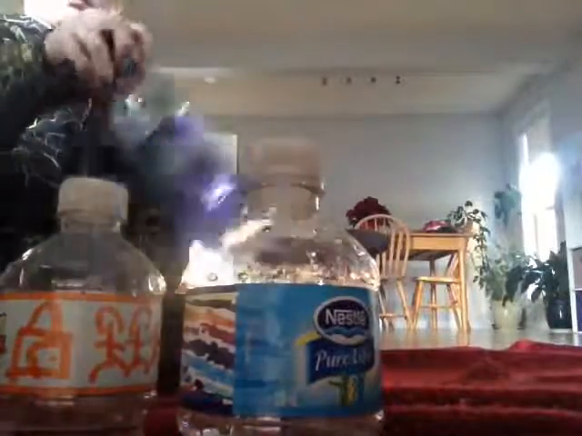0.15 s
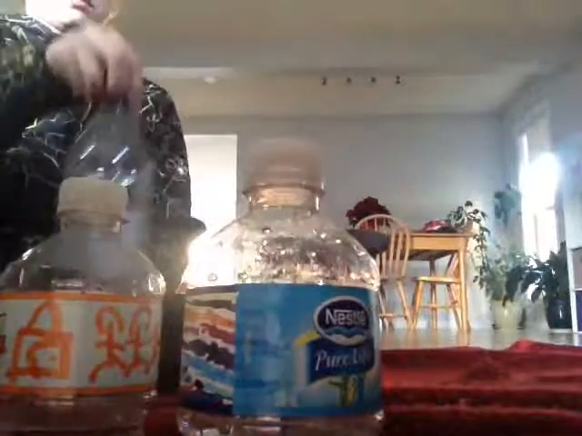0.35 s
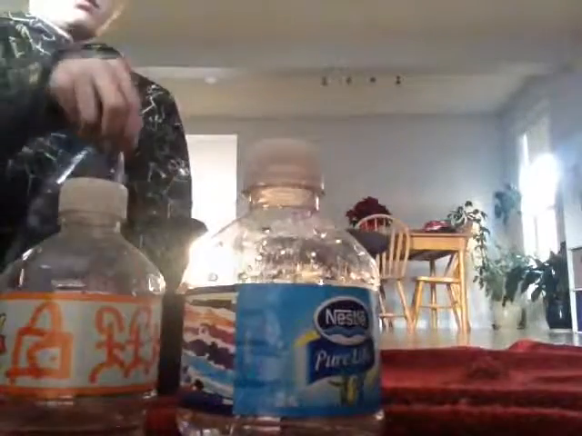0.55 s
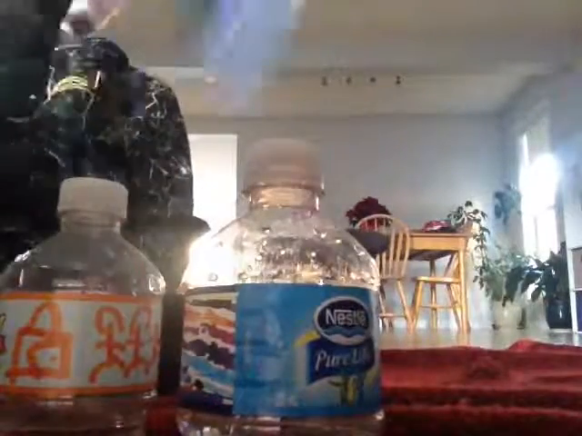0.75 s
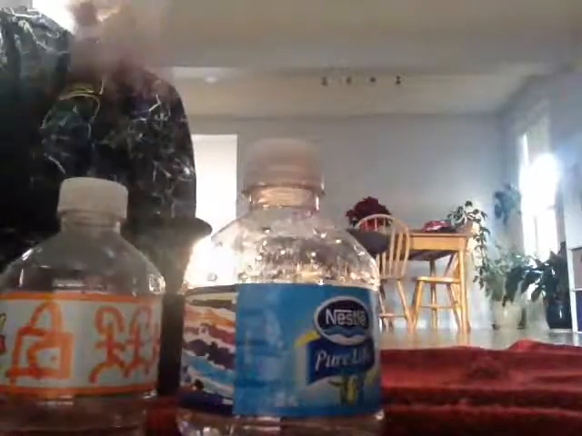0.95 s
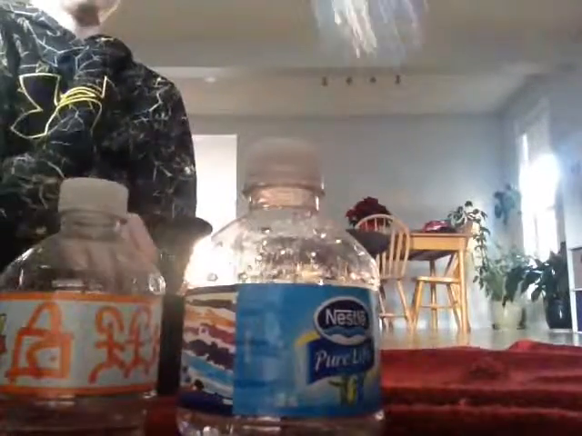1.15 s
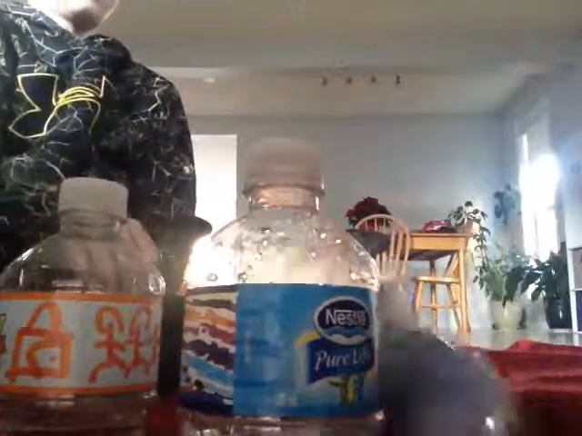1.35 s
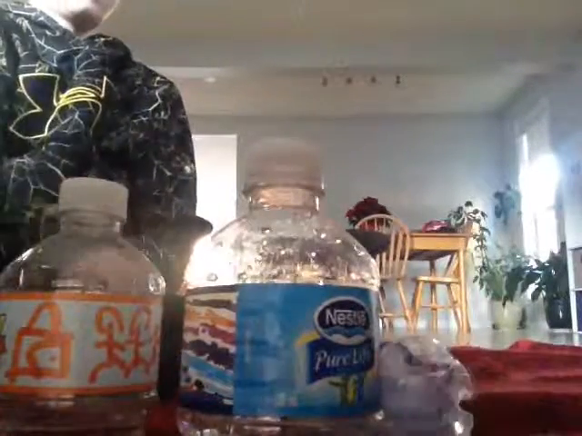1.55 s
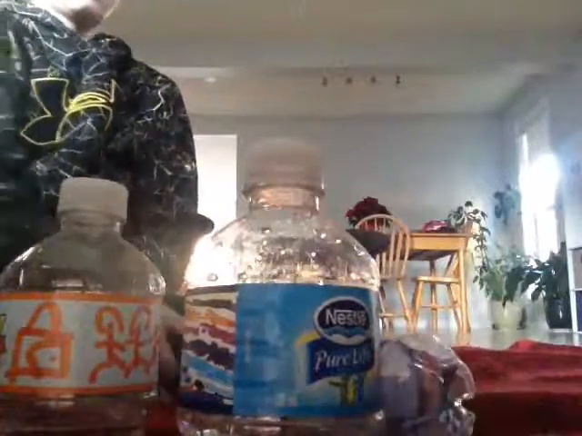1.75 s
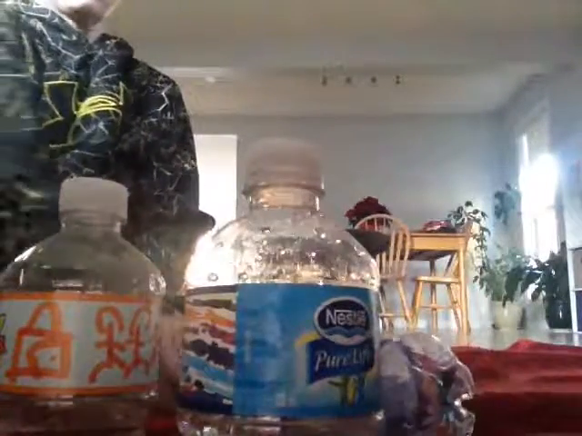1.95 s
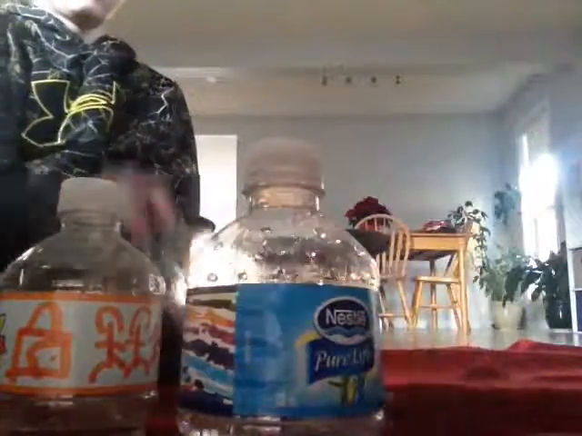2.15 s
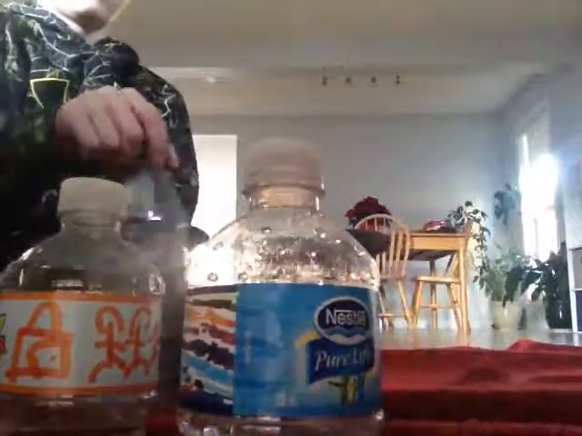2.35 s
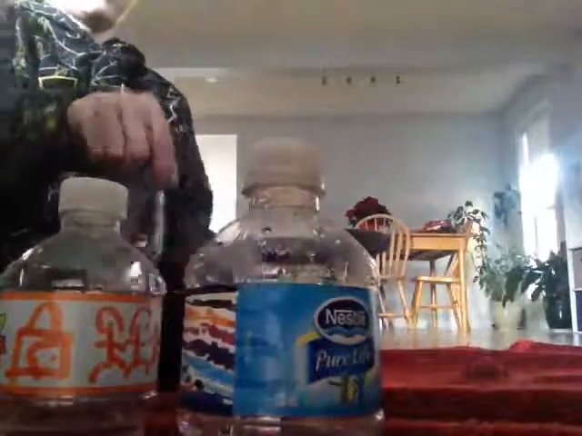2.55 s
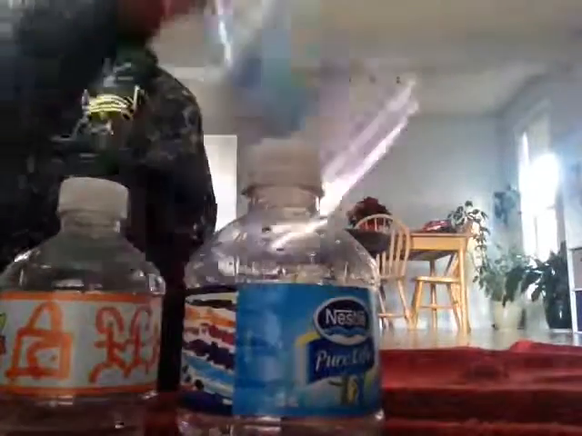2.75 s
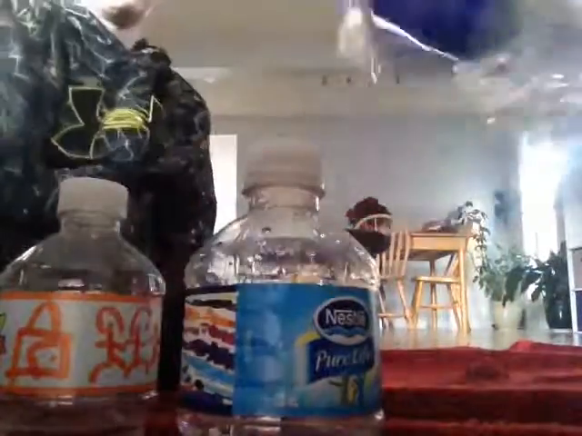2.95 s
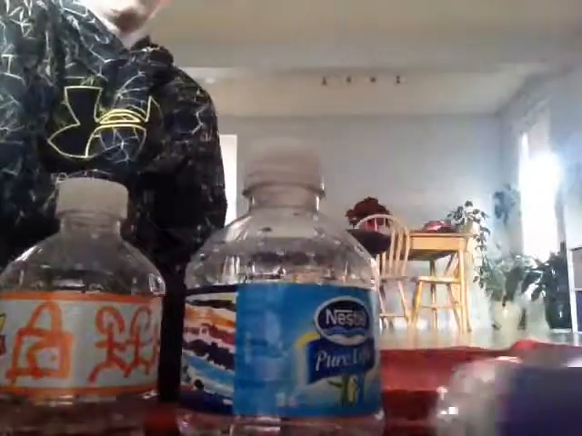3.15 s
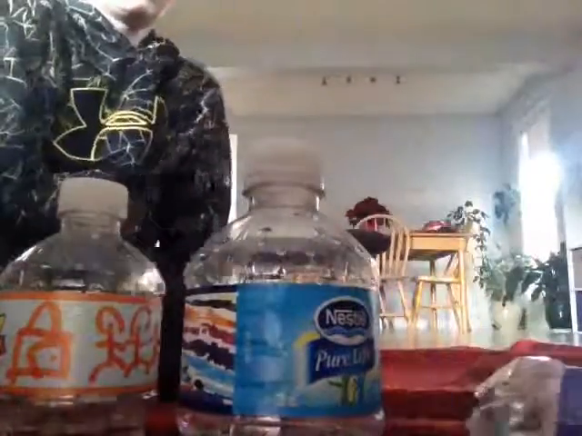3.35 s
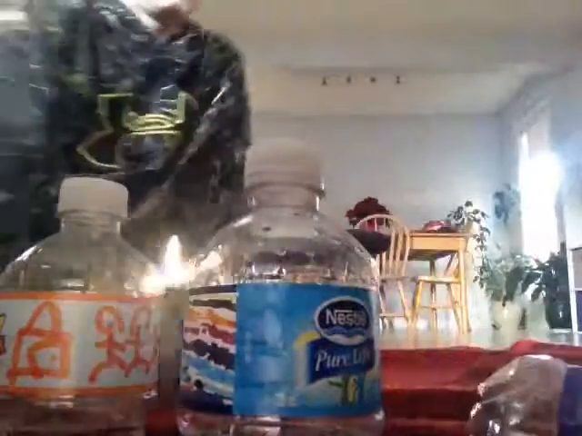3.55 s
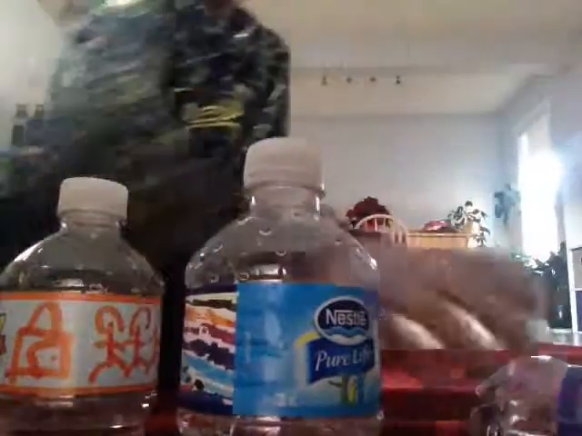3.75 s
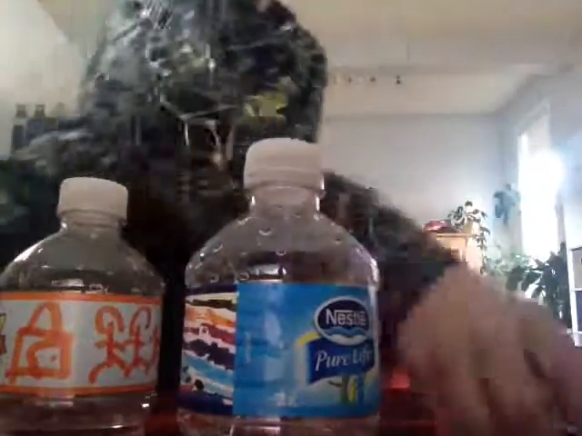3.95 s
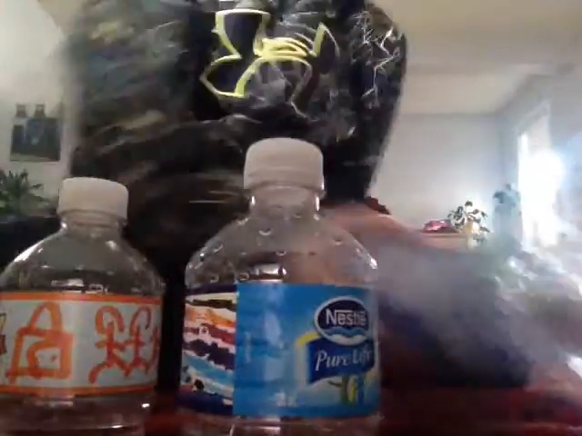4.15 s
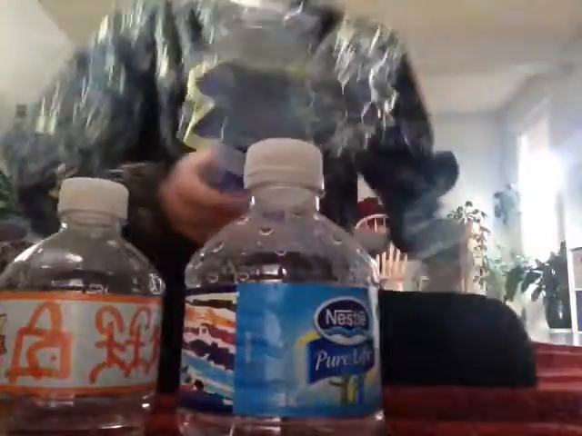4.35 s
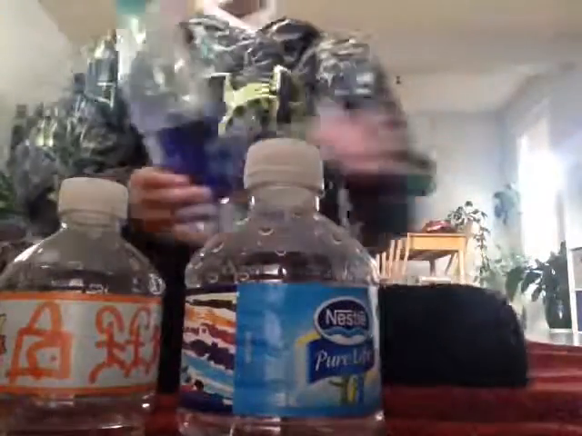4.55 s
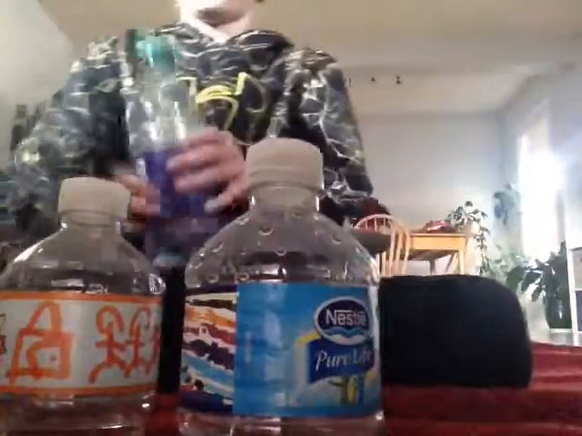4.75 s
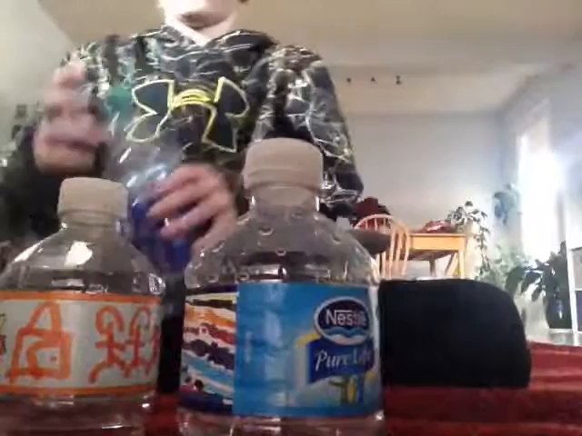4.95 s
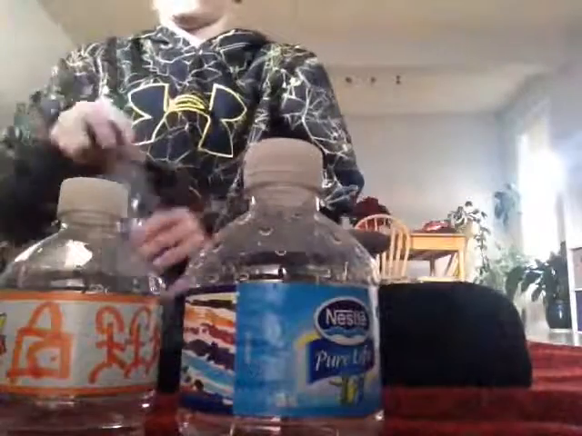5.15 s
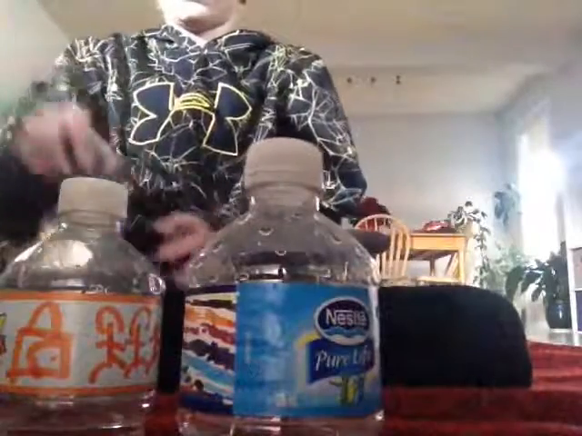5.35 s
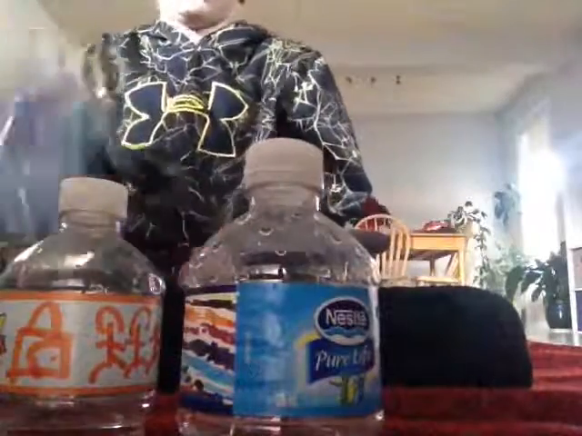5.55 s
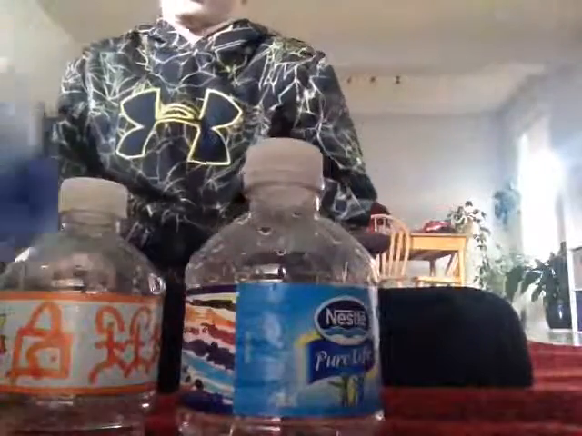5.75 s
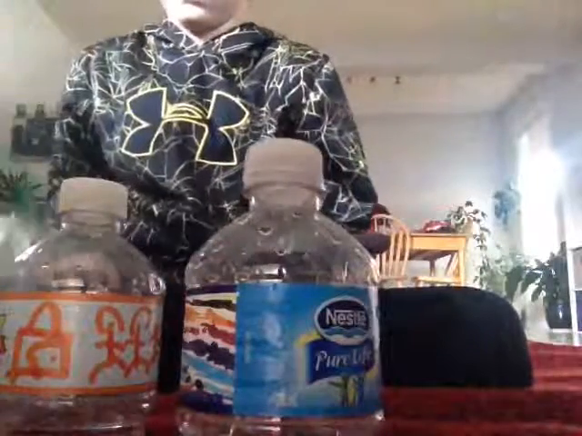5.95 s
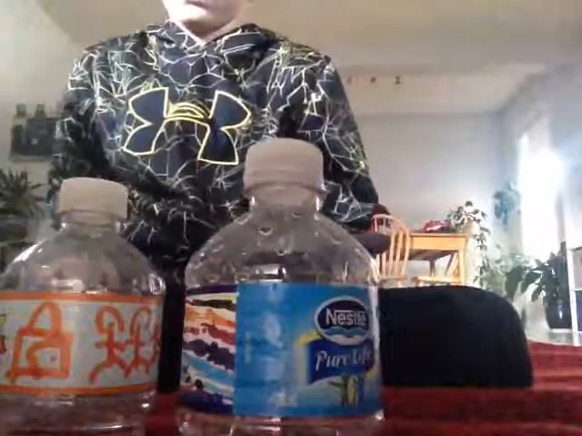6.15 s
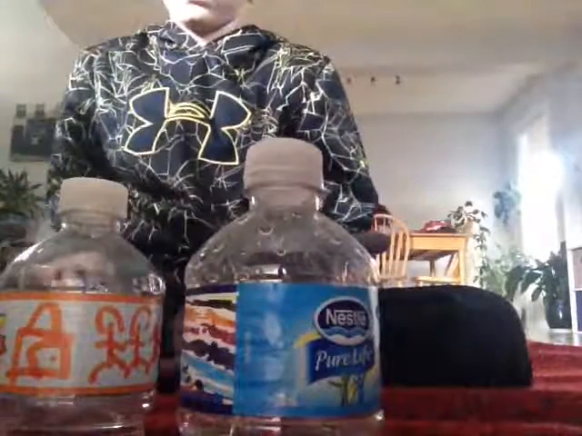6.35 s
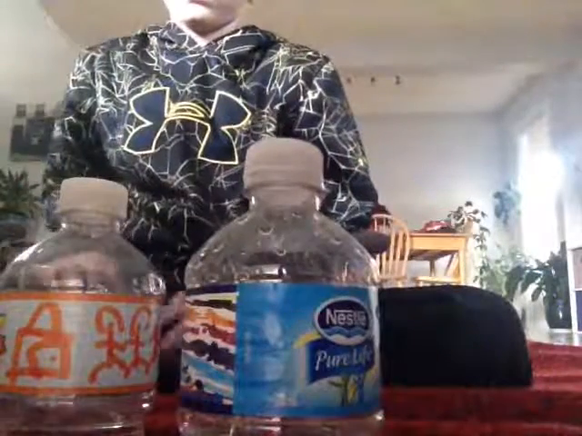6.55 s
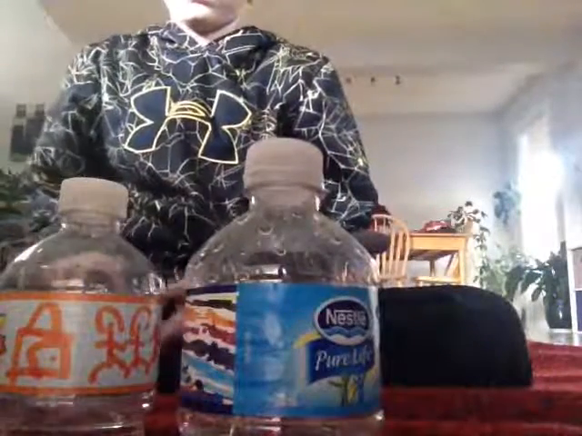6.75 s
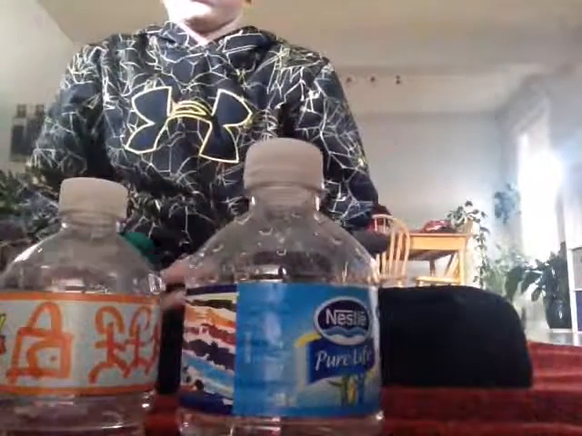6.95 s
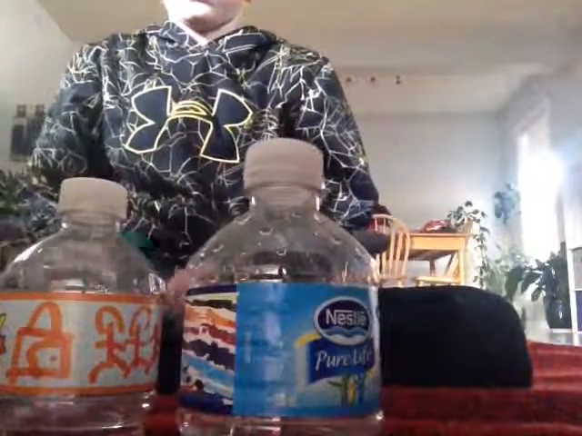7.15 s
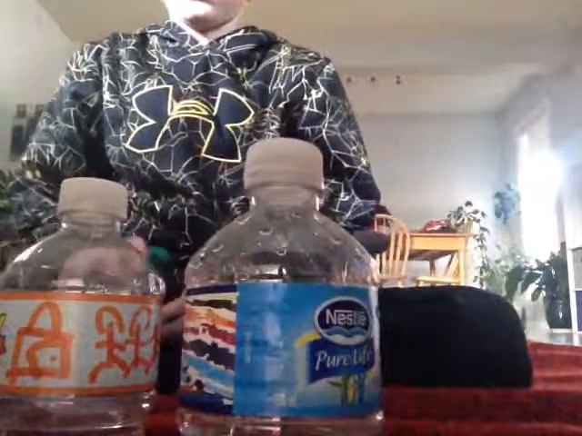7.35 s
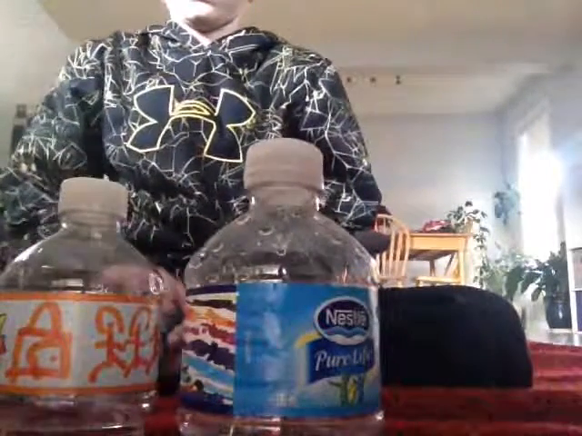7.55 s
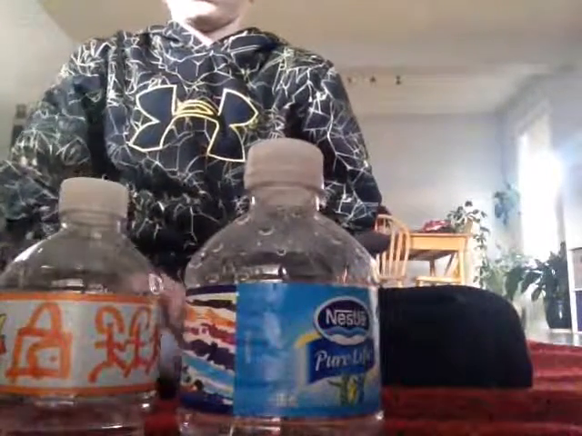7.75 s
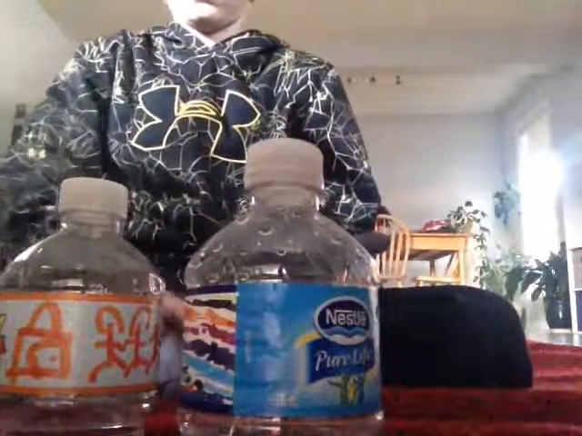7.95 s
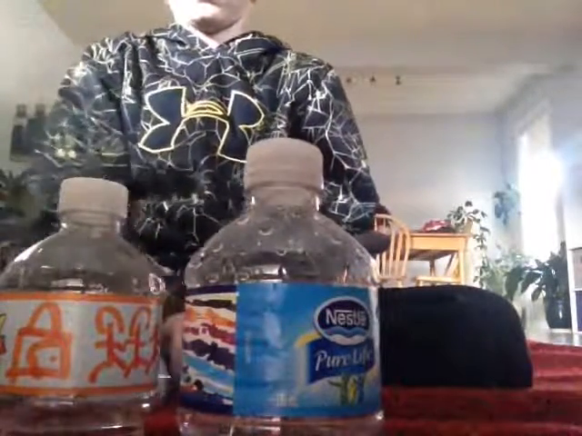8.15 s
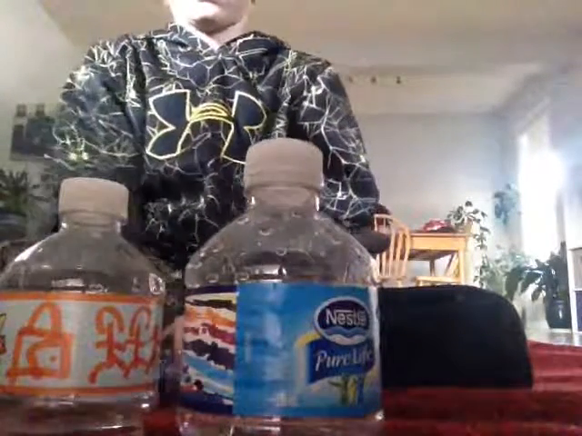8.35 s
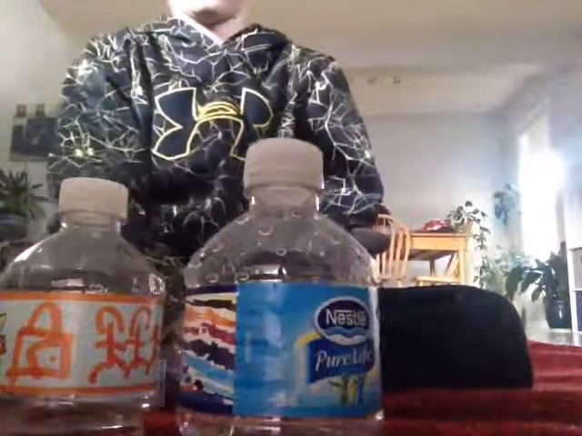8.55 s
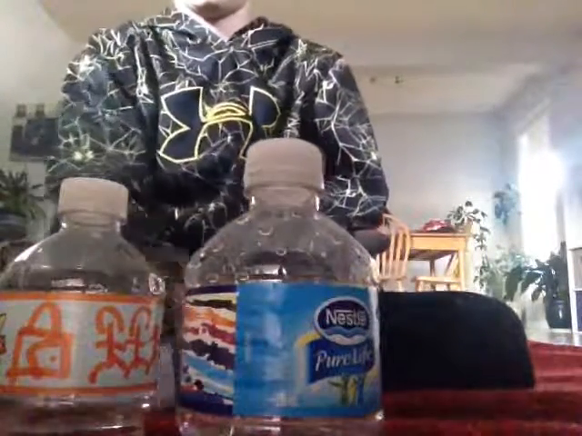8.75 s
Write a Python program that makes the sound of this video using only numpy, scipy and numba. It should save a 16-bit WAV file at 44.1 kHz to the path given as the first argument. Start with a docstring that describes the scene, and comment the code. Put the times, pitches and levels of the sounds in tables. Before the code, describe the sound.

Thin plastic bottles part-filled with water are flipped and land with heavy dull thumps, sloshing and crackling, in a quiet carpeted room.

```python
"""In a quiet, carpeted living room thin plastic bottles, partly filled with water, are flipped and land near a
small microphone. Each landing is a gliding thump with ringing floor modes; water and rubbing hands are clouds
of short sine grains; knocks on the walls are damped modes started by a noise crack. One air pocket hums upward.
Noise that dies away gives the room's echoes; steady hiss and wavering appliance tones lie beneath."""
import sys
import numpy as np
from scipy import signal
from scipy.fft import rfft, irfft
from scipy.io import wavfile
from scipy.ndimage import uniform_filter1d
from numba import njit

SR = 44100
rng = np.random.default_rng(int(sys.argv[2]) if len(sys.argv) > 2 else 0)


def transcribe(u):
    """Save the signal u as a 16-bit wav file named by the first command-line argument.

    u: samples, shape (n,) or (channels, n), limited to [-1, 1]; the rate is SR.
    q: integer samples, one column per channel.
    """
    v = np.clip(np.atleast_2d(u).T, -1, 1)
    q = np.round(v * 32767).astype(np.int16)
    wavfile.write(sys.argv[1], SR, q)


def rack_gain(trim_db):
    """Turn a fader trim in dB into the linear factor to multiply a signal by."""
    fader = np.asarray(trim_db, float)
    return 10 ** (fader / 20)


N = 387638
TIME_S = np.arange(N) / SR


def decay(t, t60):
    """Exponential damping: the amplitude falls by 60 dB in t60 seconds."""
    return np.exp(-np.log(1000) * t / t60)


def unit(x):
    """Root-mean-square normalisation: scale to rms 1."""
    return x / np.sqrt(np.mean(x ** 2))


def add(out, start_s, sound, peak_db):
    """Superposition: a sound joins the mixture at its time and peak level."""
    i = int(start_s * SR)
    piece = sound[:N - i] * rack_gain(peak_db) / np.abs(sound).max()
    out[i:i + len(piece)] += piece


def walk(rate_hz):
    """Low-pass random fluctuation: levels held 1 / rate_hz s, slewed twice; spread near 1."""
    hold = int(SR / rate_hz)
    steps = np.repeat(rng.standard_normal(N // hold + 1), hold)
    return 1.3 * uniform_filter1d(uniform_filter1d(steps, hold), hold)[:N]


def strike(modes, push):
    """Modal synthesis: a push, convolved with damped cosines, sets the modes ringing; peak 1."""
    t = TIME_S[:SR // 4]
    ring = sum(rack_gain(db) * decay(t, t60) * np.cos(2 * np.pi * hz * t) for hz, db, t60 in modes)
    sound = signal.fftconvolve(ring, push)[:len(t)]
    return sound / np.abs(sound).max()


@njit
def grains(length, start, hz, cycles, glide, size):
    """Damped oscillators as turning phasors: each swells for a moment, then dies as its pitch slides up."""
    out = np.zeros(length)
    for k in range(len(start)):
        n = int(cycles[k] * SR / hz[k]) + 2
        step = 2 * np.pi * hz[k] / SR
        turn = np.exp(1j * step - 5 / n)
        slide = np.exp(1j * step * glide / n)
        phasor = 1.5 * size[k] + 0j
        closed, opening = 1., np.exp(-25 / n)
        for i in range(start[k], min(start[k] + n, length)):
            out[i] += phasor.imag * (1 - closed)
            phasor *= turn
            turn *= slide
            closed *= opening
    return out


def patter(bursts, pitched, colour, count, cycles, spread_db, glide):
    """Granular texture: count grains a second, each at the level of the bursts at its moment and pitch."""
    # pitches that the plastic shell favours: pitch_hz, width_hz, level_db
    shell_peaks = [(1050, 150, 3), (1800, 200, 3), (3400, 350, 5)]
    half_width_octaves = 0.47  # of a pitched burst, 6 dB down
    when, where, big, long = rng.random((int(count * N / SR), 4)).T
    when = when * N / SR
    hz = 135 + 15300 * where ** 2
    octaves = np.log2(hz / 2200)

    def envelope_db(peak_s, swell_s, fade_s):
        before = (peak_s - when) / max(swell_s, .005)
        after = (when - peak_s) / max(fade_s, .005)
        return -60 * np.maximum(before, after)

    broad = sum(rack_gain(db + tilt_db * octaves + envelope_db(s, swell, fade)) ** 2
                for s, db, tilt_db, swell, fade in bursts)
    narrow = sum(rack_gain(db - 6 * (np.log2(hz / pitch) / half_width_octaves) ** 2 + envelope_db(s, swell, fade)) ** 2
                 for s, db, pitch, swell, fade in pitched)
    colour_hz, colour_points_db = np.transpose(colour)
    colour_db = np.interp(np.log(hz), np.log(colour_hz), colour_points_db)
    colour_db = colour_db + sum(d * np.exp(-((hz - f) / w) ** 2) for f, w, d in shell_peaks)
    turns = cycles * (.5 + long) * (hz / 1000) ** 0.24  # small bright grains ring for more cycles
    # equal power per octave whatever the grain's length and the crowding at its pitch
    even = np.sqrt(hz / turns / count * 45 / np.sqrt(hz / 15500))
    # a few grains stand out
    rare = rack_gain(-spread_db * np.log(1 - big)) * np.sqrt(1 - min(spread_db, 4) * np.log(10) / 10)
    level = np.sqrt(broad * rack_gain(colour_db) ** 2 + narrow)
    heard, size = level > 1e-5, level * even * rare
    return grains(N, (when[heard] * SR).astype(int), hz[heard], turns[heard], glide, size[heard])


def background():
    """Stationary noise shaped by a spectrum, with appliance tones of slightly wavering level and pitch."""
    # spectral shape of the hiss of room and microphone: pitch_hz, relative_density_db
    hiss_shape = [(20, -32.5), (60, -32), (100, -21.5), (150, -6.5), (200, -4), (250, -5), (330, -4.5),
                  (500, -7), (620, -7), (800, -15.5), (1600, -18.5), (4600, -22), (13500, -26.5),
                  (15400, -35.5)]
    # appliance tones: pitch_hz, central_rms_db
    hum = [(188.4, -69), (339, -76), (594.5, -65)]
    hiss_rms_db = -61.5
    f = np.fft.rfftfreq(N, 1 / SR)
    hz, db = np.transpose(hiss_shape)
    spectrum = rfft(rng.standard_normal(N)) * rack_gain(np.interp(np.log(f + 1), np.log(hz), db))
    out = unit(irfft(spectrum, N)) * rack_gain(hiss_rms_db)
    for tone_hz, tone_db in hum:
        waver_db, waver_hz = 1.5 * walk(12), walk(10)
        phase = 2 * np.pi * np.cumsum(tone_hz + waver_hz) / SR
        out += np.sqrt(2) * rack_gain(tone_db + waver_db) * np.sin(phase)
    return out


def knocks():
    """Modal ringing of a thin wall, its pitch set by grip and water level; a bright noise crack starts it."""
    # knocks, slaps and ticks on a held bottle: start_s, peak_db, main_ring_hz, crack_re_ring_db, crack_hz
    held_knocks = [(0.889, -46.5, 1450, 9.5, 2400), (0.915, -40, 2400, -10, 2560),
                   (1.0225, -38, 1900, -9, 3600), (1.026, -35, 2000, -2, 2400),
                   (1.0275, -21, 1820, -17, 3200), (1.0612, -51, 1800, 7, 4930),
                   (1.094, -40, 1960, 3, 3800), (1.145, -43, 1420, -2, 3400), (1.337, -6.5, 482, -38, 3800),
                   (1.356, -22, 475, -15, 3180), (1.412, -31, 650, -22, 10900),
                   (1.425, -33.5, 1360, -20, 3600), (1.447, -42, 1750, -7, 3600),
                   (1.521, -42.5, 1080, -10, 4800), (1.744, -43.5, 1100, -12, 7040),
                   (1.982, -37, 1580, 2.5, 3400), (2.059, -31, 1640, -30, 2900), (2.08, -55, 1680, 7, 3320),
                   (2.113, -35, 1140, -18, 2700), (2.215, -46, 605, -11, 3700),
                   (2.256, -34, 1280, -37, 3000), (2.304, -40, 1120, -33, 6600),
                   (2.32, -41, 895, -13, 2900), (2.336, -50, 425, -20, 4800), (2.363, -45, 680, -18, 7400),
                   (2.38, -45, 553, -17, 3200), (2.845, -23.5, 1854, 3.5, 2430),
                   (2.849, -23, 2320, -4, 2555), (2.841, -31.5, 410, -1, 1700), (2.933, -46, 610, 11, 9600),
                   (2.951, -22.5, 1870, -1, 2480), (2.968, -35, 1770, 9.5, 12800),
                   (3.016, -27, 1720, -20.5, 2600), (3.025, -35.5, 2390, 2, 12200),
                   (3.1, -13, 444, 2.5, 13200), (3.113, -15, 493, -4.5, 3350),
                   (3.119, -14.5, 502, -6, 3250), (3.167, -18, 1050, -26, 10400),
                   (3.2045, -20, 824, -0.5, 2870), (3.209, -22, 520, -20, 3300),
                   (3.224, -17.5, 967, -4.5, 3070), (3.284, -39, 650, 3, 7200),
                   (3.366, -37.5, 1060, -9.5, 2880), (3.495, -43.5, 690, 1.5, 3240),
                   (3.529, -19.5, 550, -20.5, 3870), (4.062, -44, 835, 16, 5850), (4.07, -37, 825, 5, 5360),
                   (4.115, -30, 1020, -4, 11800), (4.156, -48, 1570, 10, 9200),
                   (4.313, -37, 1530, -6, 4260), (4.371, -36, 450, 0, 8200),
                   (4.684, -47.5, 544, 17.5, 8300), (4.803, -47, 2300, -4, 2700), (5.04, -48, 457, 3, 2480),
                   (5.606, -42, 550, 15, 7860), (5.624, -15.5, 500, -12, 2650),
                   (5.629, -9, 717, -18.5, 2620), (5.68, -28.5, 1530, 2, 5600),
                   (5.738, -31.5, 1440, -21, 9200), (5.761, -29, 2540, -11, 2680),
                   (5.775, -36, 2580, 0, 2700), (5.865, -15, 445, -11, 14700),
                   (5.897, -24, 1180, -14, 3540), (5.911, -25, 870, -9, 3550), (6.007, -38.5, 605, 4, 3970),
                   (6.018, -35.5, 950, -6, 5270), (6.045, -33.5, 676, -16, 7400),
                   (6.134, -44, 426, -9, 7350), (6.273, -40, 1070, -16, 2900),
                   (6.42, -35.5, 440, 3.5, 2430), (6.675, -39, 555, -15, 2600),
                   (6.505, -43, 484, 3.5, 3440), (6.853, -34, 930, -3.5, 3470),
                   (6.858, -41.5, 430, -18, 1980), (7.038, -45, 580, -11, 5500),
                   (7.517, -49.5, 430, 2, 2600), (7.801, -47, 576, -12, 6400), (8.083, -45, 520, -12, 3300),
                   (8.154, -52, 616, 0, 2700), (8.768, -44, 466, -2.5, 6100)]
    # hollow knocks on a bottle that no hand damps: same columns
    free_knocks = [(2.867, -13.5, 647, -6, 8100), (3.5315, -12.5, 685, -25.5, 3840),
                   (4.288, -40, 1730, -18, 3000), (4.436, -34.5, 440, -13, 5800),
                   (4.478, -38, 1910, -9, 2800), (4.973, -34.5, 500, -16.5, 9150)]
    # modes of the wall: ratio_to_main_ring, level_db, share_of_t60
    wall_modes = [(0.649, -6.5, 0.56), (.84, -1, 0.46), (1, 12.5, 0.38), (1.075, -11, 0.2), (1.3, -13, .5),
                  (1.599, 1, 0.51), (2.4, -25, 0.44)]
    # the air in the bottle answers every knock: pitch_hz, level_db, t60_s
    air_mode = (700, 3.82, 0.022)
    held_t60_s = 0.041  # at 1 kHz and -30 dB
    damping_power, strength_power = 0.49, 0.038  # shorter ring at high pitch, longer when struck hard
    free_ring = 2.1  # times longer than a held wall
    fill_cycles = 1.2  # the air inside takes a cycle or two to join in
    out = np.zeros(N)
    t = TIME_S[:SR // 20]
    events = held_knocks + free_knocks
    chance = rng.standard_normal((len(events), len(t) + len(wall_modes)))
    for k, ((s, db, hz, crack_db, crack_hz), noise) in enumerate(zip(events, chance)):
        stray = 1 + .025 * noise[len(t):]  # overtones differ a little each time
        t60 = held_t60_s * (hz / 1000) ** -damping_power * rack_gain(db + 30) ** strength_power
        if k >= len(held_knocks):
            t60 *= free_ring
        modes = [(hz * ratio * (1 if ratio == 1 else e), mode_db, t60 * share)
                 for (ratio, mode_db, share), e in zip(wall_modes, stray)]
        push = np.diff(np.hanning(int(.9 * SR / hz) + 4))
        ring = strike(modes + [air_mode], push)
        ring = ring * (1 - np.exp(-TIME_S[:len(ring)] * hz / fill_cycles))
        radiation = signal.butter(2, hz / 2, "high", fs=SR)  # a thin wall radiates little below its ring
        add(out, s, signal.lfilter(*radiation, ring), db)
        crack = noise[:len(t)] * decay(t, 0.024) * np.clip(t / 0.00041, 0, 1)
        crease = signal.iirpeak(crack_hz, 7, fs=SR)  # the crease that snaps has a pitch of its own
        add(out, s, signal.lfilter(*crease, crack) + .1 * crack, db + crack_db)
    return out


def water():
    """Superposed oscillating grains: water slaps the wall, gurgles, and rocks as a mass at the base."""
    # water thrown at the wall: peak_s, level_db, tilt_db_per_octave, swell_s, fade_s (each spans 60 dB)
    sloshes = [(.895, -61.5, -1, 0.1, 0.24), (1.035, -59, -0.5, 0.029, 0.33), (1.16, -73, 2.5, 0.37, 0.24),
               (1.337, -33.5, -1, 0.02, 0.11), (1.43, -53.5, -2, 0.37, 0.21),
               (1.54, -65.5, -4.5, 0.6, 0.34), (1.74, -77, -3, 0.53, 0.37),
               (2.843, -44.5, -1.6, 0.036, 0.26), (2.94, -51, 2, 0.045, 0.34),
               (2.971, -51.5, 1, 0.18, 0.29), (3.015, -52.5, 0.5, 0.16, 0.14),
               (3.105, -36.5, -1, .02, 0.34), (3.145, -44, -1.8, 0.22, 0.42), (3.227, -41.5, 0, 0.16, .18),
               (3.35, -59, -1, 1, 0.36), (3.53, -65, 1, 0.87, 0.29), (3.66, -79, 7, 1, 0.88),
               (5.59, -59, 0, 0.053, .2), (5.61, -42, -2.1, 0.048, 0.312), (5.697, -46, 2.5, 0.084, 0.21),
               (5.77, -59, -1, 0.3, 0.4), (5.871, -40.5, -2, 0.039, 0.16), (5.93, -55, -3.5, 0.13, 0.41),
               (6.03, -58.5, -3, 0.31, 0.35), (6.15, -68.5, -1, 0.86, 0.53)]
    # gurgling against one part of the wall: peak_s, level_db, pitch_hz, swell_s, fade_s
    gurgles = [(.91, -59.5, 2290, 0.34, 0.47), (1.04, -57, 1920, .05, 1), (1.11, -63.5, 3600, .1, 0.62),
               (1.42, -47.5, 1300, 0.19, 0.27), (1.52, -52.5, 1290, 0.4, 0.27),
               (2.85, -35, 2300, 0.039, .25), (2.89, -38, 420, 0.14, 0.18), (2.96, -41, 2200, .1, 0.41),
               (3.115, -50, 3300, 0.046, 0.57), (3.22, -46, 970, 0.22, 0.77),
               (5.586, -46.5, 380, 0.082, 0.093), (5.63, -44, 900, 0.072, .12),
               (5.68, -42, 370, 0.39, 0.67), (5.77, -55, 430, .3, 0.33), (5.72, -44, 6700, .12, 0.098),
               (5.9, -48, 1200, .1, 0.36)]
    # the mass of water drops to the base and rocks there: same columns as the gurgles
    surges = [(1.338, -24.5, 169, 0.009, .15), (1.41, -39, 171, .2, 0.6), (1.54, -54, 169, .3, .5),
              (2.845, -49, 230, .03, 0.1), (2.95, -42.5, 199, .1, 0.24), (3.107, -26, 140, 0.011, 0.27),
              (3.15, -30, 140, 0.12, 0.23), (3.23, -51.5, 158, 0.23, 0.84), (5.69, -42.5, 228, 0.23, 0.12),
              (5.92, -34.5, 145, 0.11, 0.49), (6.03, -46, 170, 0.4, 0.31), (6.16, -60.5, 170, .3, 0.89)]
    # colour of the sloshes: pitch_hz, gain_db
    water_colour = [(135, -14.5), (220, -4.5), (400, 5.5), (700, 2), (1300, 1.5), (2200, 0.5), (4500, -4.5),
                    (7500, 1.5), (11000, 2), (14500, -6)]
    return patter(sloshes, gurgles + surges, water_colour, count=6000, cycles=10, spread_db=1.5, glide=.12)


def air_pocket():
    """Cavity resonance: the air hums upward as the first bottle turns over, faded in and out."""
    # path of the tone: time_s, pitch_hz, rms_db
    hum_path = [(1.03, 100.3, -96), (1.04, 101.5, -71), (1.05, 102.8, -65), (1.118, 111.8, -61.5),
                (1.172, 131.8, -58.5), (1.232, 171.0, -50), (1.29, 184.2, -68.5)]
    s, hz, db = np.transpose(hum_path)
    gain = uniform_filter1d(rack_gain(np.interp(TIME_S, s, db, -120, -120)), SR // 50)
    phase = 2 * np.pi * np.cumsum(np.interp(TIME_S, s, hz)) / SR
    return np.sqrt(2) * gain * np.sin(phase)


def landings():
    """Impact excitation: the heavy base shudders, slower as the water settles, and the boards ring on."""
    # landings and bounces: start_s, peak_db, contact_ms, nominal_shudder_hz
    impacts = [ (1.3306, .5, 13, 205), (1.379, -26, 13, 178), (1.403, -17.5, 8.7, 192),
               (1.453, -36, 16, 215), (3.0972, -4.5, 14, 195), (2.866, -30, 24, 230),
               (3.221, -24.5, 9.7, 155), (3.265, -36, 12, 143), (4.679, -40.5, 20, 200),
               (5.603, -29, 8.7, 200), (5.63, -23.5, 14, 204), (5.8638, -1.5, 17.5, 205),
               (5.905, -18.5, 13, 186), (5.967, -29, 18, 205), (6.031, -40, 17, 200),
               (6.097, -38.5, 15, 195), (6.422, -52, 8, 200), (6.673, -53, 10, 201), (7.878, -46, 18, 226)]
    # modes of the floor: pitch_hz, level_db, t60_s
    floor_modes = [(95, -1, .15), (123, -2, .2), (140, 29.5, 0.12), (183, -34, 0.039), (236, -16.5, 0.18),
                   (340, -28.5, 0.1)]
    boards_db = -12  # ring of the boards against the thump
    out = np.zeros(N)
    for s, db, contact_ms, hz in impacts:
        u = np.linspace(0, 1, int(contact_ms * SR / 1000))
        phase = 2 * np.pi * np.cumsum(hz * (1.25 - .65 * u)) / SR
        thump = -np.sin(np.pi * u ** .5) * np.sin(phase)
        add(out, s, thump, db)
        add(out, s, strike(floor_modes, thump), db + boards_db)
    return out


def handling():
    """Friction as many tiny oscillations: hands and sleeves stroke carpet and bottle, skin scuffs the shell."""
    # strokes: peak_s, level_db, tilt_db_per_octave, swell_s, fade_s (each spans 60 dB)
    strokes = [(1.99, -72, 2.5, 0.083, 0.65), (2.12, -72.5, -1, 0.35, 0.3), (2.32, -68, 0, 0.64, 0.4),
               (3.79, -64, -1.5, 0.5, 1), (3.845, -60, 5.5, 0.13, 0.14), (3.93, -63.5, 2.5, 0.49, .6),
               (4.0, -58.5, 0.3, 0.64, 0.72), (4.09, -57, -0.2, 0.3, 0.95), (4.25, -63, 1.1, 0.67, 1),
               (4.39, -62, 0.4, 0.56, 1), (4.55, -65, -2, 1, 1), (4.689, -57, 0.3, 0.17, 0.18),
               (4.77, -68.5, 0.3, 0.95, 0.48), (4.983, -68, -1.5, 0.11, .1), (5.226, -73.5, 2, 0.62, .5),
               (6.32, -75, 1, 0.68, 0.82), (6.45, -67.5, 0.2, 0.92, .6), (6.683, -68, 1, 0.45, 0.22),
               (6.75, -67.5, -1, .3, .3), (6.855, -59, -1.5, 0.086, 0.083), (7.525, -69, 0.5, 0.44, .4),
               (7.888, -68.5, 1, 0.41, 0.9), (8.15, -69, 2.5, 0.61, 0.7), (8.225, -71, 3.5, 0.39, 0.16),
               (8.4, -70.5, 1, 1, 0.99), (8.567, -74, -1.3, 0.46, 0.68), (8.78, -69.5, 2, 1, .5)]
    # skin scuffing over the shell: peak_s, level_db, pitch_hz, swell_s, fade_s
    scuffs = [(3.9, -54, 1600, .8, 1.7), (4.15, -57.5, 1800, 1.2, 2.5), (6.87, -57, 2000, .05, 0.38),
              (7.83, -52, 517, 0.24, 0.71), (7.888, -42.5, 620, 0.31, 0.093), (7.965, -48, 610, 0.13, 0.15),
              (7.99, -47.5, 900, .1, .15), (8.015, -56, 1200, 0.11, 0.38), (8.13, -50, 565, 0.32, .3),
              (8.225, -45, 516, 0.29, 0.19), (8.4, -58.5, 595, 1.1, 0.6)]
    # colour of the strokes: pitch_hz, gain_db
    cloth_colour = [(135, -12.5), (220, -1.5), (450, 8), (800, 5), (1500, 5), (2200, -1), (4500, -3.5),
                    (8000, 1), (11000, 0), (14500, -7)]
    return patter(strokes, scuffs, cloth_colour, count=9000, cycles=8.6, spread_db=1.65, glide=.02)


def room(x):
    """Diffuse reverberation: dense echoes of a furnished room, bass and treble fading at their own pace."""
    low_t60_s, high_t60_s, split_hz = 0.18, 0.33, 300
    treble_db, echo_db = -5, -15.5  # furnishings swallow more above the split
    t = TIME_S[:int(.6 * SR)]
    noise = rng.standard_normal(len(t))
    low = signal.sosfilt(signal.butter(2, split_hz, fs=SR, output="sos"), noise)
    echoes = low * decay(t, low_t60_s) + (noise - low) * rack_gain(treble_db) * decay(t, high_t60_s)
    echoes = echoes * np.clip(t / 0.0069 - .3, 0, 1)  # first walls answer after a few ms
    early_energy = np.mean(echoes[:SR // 10] ** 2) * SR / 10
    return signal.fftconvolve(x, echoes / np.sqrt(early_energy))[:N] * rack_gain(echo_db)


def scene():
    """Linear superposition: all near sounds and their echoes, less deep bass, plus the background."""
    near = landings() + knocks() + water() + handling() + air_pocket()
    # the small microphone misses the deep bass, below 100 Hz
    cut = signal.butter(4, 100, "high", fs=SR, output="sos")
    return (signal.sosfilt(cut, near + room(near)) + background())[None]


def band_limit(x):
    """A steep low-pass at the top of the band."""
    return signal.sosfilt(signal.butter(12, 16570, fs=SR, output="sos"), x)


def record(dry):
    """Nonlinear transduction: the capsule bends loud sound to one side, loses the top and rounds off peaks."""
    bent = dry - 0.103 * dry ** 4
    low_pass = signal.ellip(8, .3, 60, 15350, fs=SR, output="sos")  # stops short of the top octave's end
    top = signal.sosfilt(low_pass, bent)
    rounded = top / (1 + np.abs(top) ** 8) ** (1 / 8)  # soft limit at full scale
    return band_limit(rounded)


dry = scene()
out = record(dry)
transcribe(out)
```